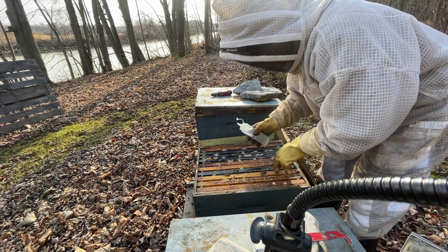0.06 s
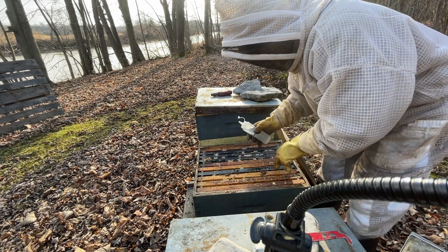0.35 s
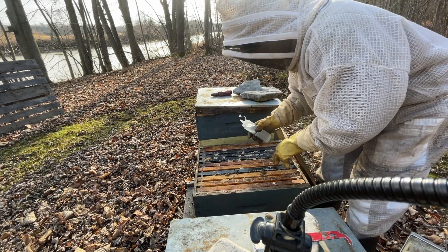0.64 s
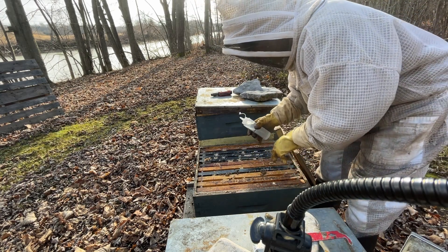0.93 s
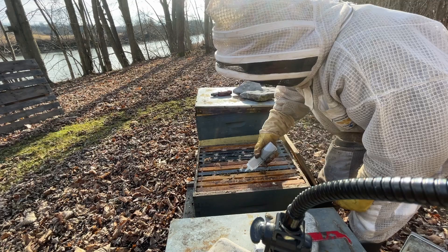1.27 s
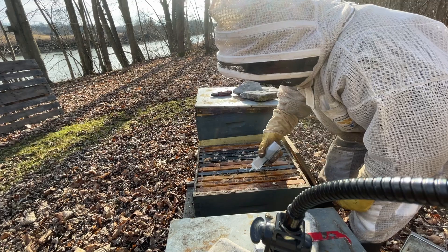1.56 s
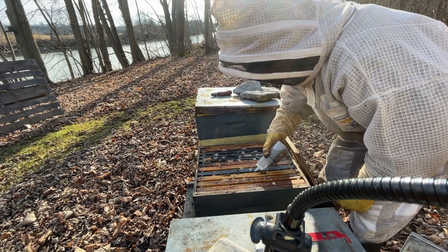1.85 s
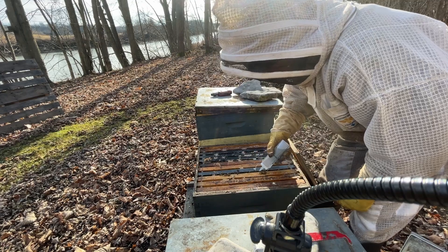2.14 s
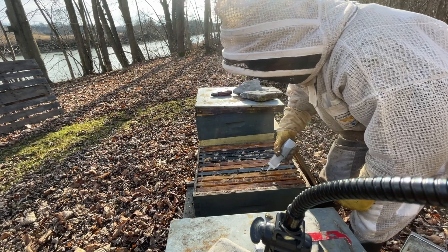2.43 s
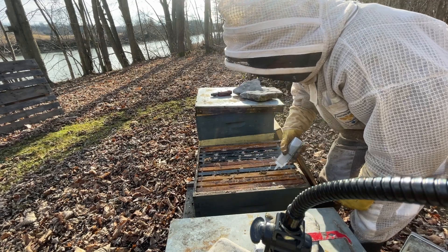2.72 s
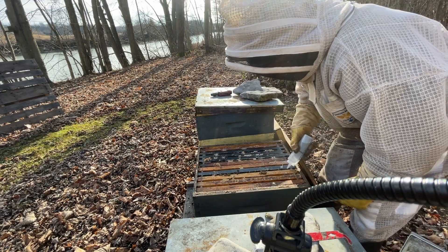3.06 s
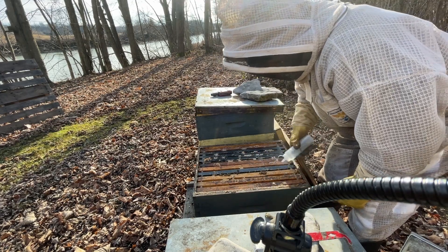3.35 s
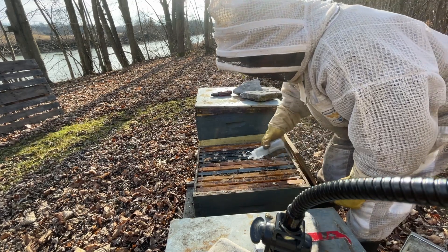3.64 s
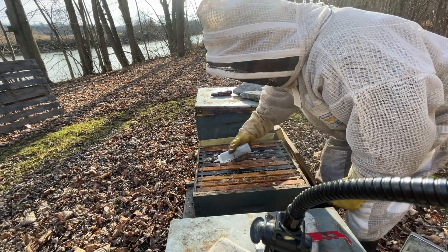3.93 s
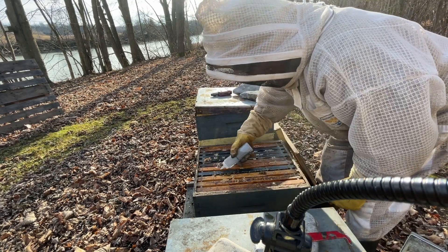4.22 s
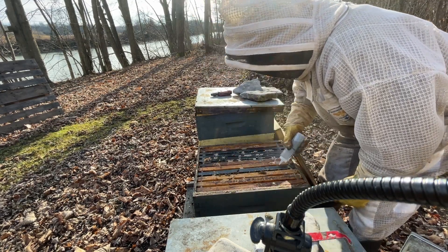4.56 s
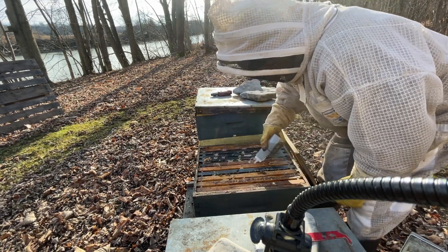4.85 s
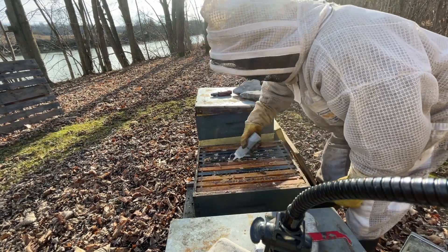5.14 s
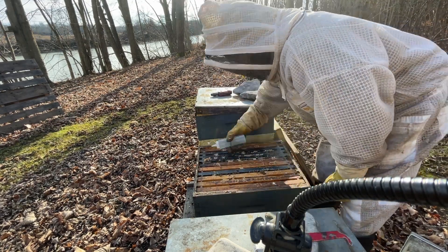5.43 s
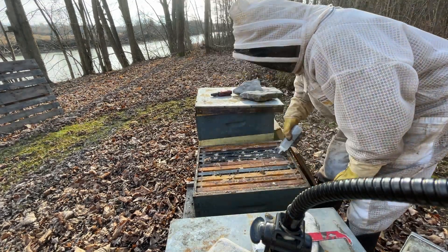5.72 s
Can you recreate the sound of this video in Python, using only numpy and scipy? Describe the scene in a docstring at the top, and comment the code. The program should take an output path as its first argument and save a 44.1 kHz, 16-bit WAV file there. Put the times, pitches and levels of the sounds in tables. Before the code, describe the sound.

An open beehive in a wood is heard in stereo from about a metre away. A low breeze, soft rustling with tiny dry leaf crackles, and faint swishes of cloth continue throughout. From the start to about 1.7 seconds, a steel tool makes roughly nine quick back-and-forth strokes, each with a metallic tick, a dry wooden knock and a short rasping hiss along wax; the last two knocks are weaker. A brief scrape comes at 2 seconds, then single ticks. Hollow box thumps cluster between 2.5 and 2.8 seconds. A tap and scrapes follow around 3.2, a sharp tick at 3.5, a hard thump with cracking resin at 3.6 and a lighter one at 3.7. A longer scrape swells around 4.1, ending in ticks. From about 4 seconds, gusts buffet the microphone, more on the left, while the edge picks faintly through wax crumbs until nearly 6 seconds.

```python
"""An open hive in a wood, the beekeeper at work about a metre from a stereo microphone.
Over a low breeze, leaves and rustling cloth come quick to-and-fro strokes: the steel tool ticks,
a frame knocks at each end of its travel, and the blade hisses along the wax. From two seconds on
there are slow scrapes and single ticks, and between them blows thump the hollow box.
From about four seconds gusts buffet the microphone while the edge picks through crumbs of wax."""
import sys
import numpy as np
from scipy import signal
from scipy.fft import rfft, irfft
from scipy.io import wavfile
from scipy.ndimage import uniform_filter1d

SR = 44100
rng = np.random.default_rng(int(sys.argv[2]) if len(sys.argv) > 2 else 0)


def persist_wave(psi):
    """Save psi, clipped to +-1, as 16-bit WAV."""
    counts = np.round(np.clip(psi, -1, 1) * 32767).astype(np.int16)
    wavfile.write(sys.argv[1], SR, np.atleast_2d(counts).T)


N = 255197
T = np.arange(N) / SR
RING_T = np.arange(int(.3 * SR)) / SR  # seconds since a contact

# The air of the wood. Each row: time in seconds, relative levels of breeze and of rustle in dB.
AIR_LEVELS = [(0.0, -44.5, -45), (0.69, -43, -48), (1.26, -43.5, -47), (1.45, -44, -45), (2.34, -45, -52),
              (2.74, -40.5, -48.5), (2.93, -44, -51.5), (3.22, -42.5, -49), (3.59, -43, -48),
              (3.85, -48.5, -53), (4.19, -45.5, -48), (5.79, -49, -55.5)]
# Spectrum of a crack. Each row: frequency in Hz, density in dB.
CRACK_COLOUR = [(600, -38), (1500, 2.5), (3000, 6.5), (5000, -7), (7500, -4.5), (10000, -14),
                (13000, -15.5), (15000, -58)]
# Modes of the hive box. Each row: frequency in Hz, level in dB, t60 in seconds.
BOX_MODES = [(75.6, -12, 0.13), (135.7, -14, .22), (156, 0, .1), (245, -1, 0.058), (365, 0, 0.064),
             (469, 0, 0.044), (529, .5, 0.038), (700, -4, 0.055), (916, -1.5, 0.048), (1061, 2.5, .035),
             (1350, 0, 0.033), (1593, -2, 0.027), (2064, -7, 0.032), (2500, -6, 0.037)]
# Pushes of the tool. Each row: knock time in seconds, strength and hardness in dB, seconds by which
# the catch of the edge leads the knock.
PUSH_STROKES = [(.232, 0, -0.5, .0215), (.6881, 0, -1, .0155), (1.121, -1, -2, .0185),
                (1.467, -10.5, -8.5, .0205)]
# Pulls back. Each row: as for a push, then catch strength in dB, lead of the bar's bump in seconds.
PULL_STROKES = [(0.0913, -1.5, -1.5, 0.057, -19, .0556), (0.4936, 0, 2.5, 0.084, -1.5, 0.05),
                (0.9804, 0, -1, .0925, -2, .057), (1.3715, 3, 1, 0.0788, -1, .0425),
                (1.694, -18, -3.5, 0.083, 0.5, .05)]


def undb(db):
    """Decibels to gain."""
    return 10 ** (np.asarray(db) / 20)


def add(out, s, sound):
    """Mix a stereo sound in at s seconds."""
    i = max(int(s * SR), 0)
    out[:, i:i + sound.shape[1]] += sound[:, :N - i]


def noise(colour, size, likeness):
    """Stereo noise of rms 1, coloured by rows of Hz and dB; likeness correlates the two sides."""
    hz, db = np.transpose(colour)
    log_hz = np.log(np.maximum(np.fft.rfftfreq(size, 1 / SR), 1))
    gain = undb(np.interp(log_hz, np.log(hz), db, left=-90, right=-90))
    mid, side = irfft(rfft(rng.standard_normal((2, size))) * gain, size)
    x = np.sqrt(1 + likeness) * mid + np.sqrt(1 - likeness) * np.array([side, -side])
    return x / x.std()


def wander(rate_hz):
    """Smooth random drift with a spread of 1."""
    step = int(SR / rate_hz)
    x = uniform_filter1d(np.repeat(rng.standard_normal(N // step + 1), step), step)[:N]
    return x / x.std()


def burst(x, db):
    """Scale a short sound so that its energy, spread over 20 ms, has this level."""
    return x * undb(db) / np.sqrt(np.sum(x ** 2) / 2 / (.02 * SR))


def blow(answer, db, hardness_db):
    """Levels of a blow's parts, low to high: strength lifts all, hardness favours the high ones."""
    return np.array(answer) + db + hardness_db * np.linspace(-.5, .5, len(answer))


def ring(modes, lo_hz, hi_hz, lag_ms, swell, scatter_db):
    """Struck modes in a band, swelling over `swell` cycles; the left port hears them lag_ms later."""
    t = np.maximum(RING_T - np.array([[lag_ms / 1000], [0]]), 0)
    out = 0
    for hz, db, t60 in modes:
        detune, size, side, turn = rng.uniform(-1.36, 1, 4)
        if lo_hz <= hz < hi_hz:
            shape = (1 - np.exp(-t * hz / swell)) ** 2 * np.exp(-np.log(1000) * t / t60)
            apart = min(hz / 1000, 1) * np.array([[1], [-1]])  # short waves differ between the ports
            pitch = hz + 14 * detune  # the grip shifts every mode a little
            wave = np.sin(2 * np.pi * pitch * t + 0.33 * turn * apart)
            out = out + undb(db + scatter_db * size + 2 * side * apart) * shape * wave
    return out


def crack(colour, rise_s, t60_s, grit_db):
    """Fibres or hard resin give way in a gritty burst."""
    size = len(RING_T)
    grit = undb(grit_db * np.repeat(rng.standard_normal(size), 16)[:size])
    shape = (1 - np.exp(-RING_T / rise_s)) ** 2 * np.exp(-np.log(1000) * RING_T / t60_s)
    return noise(colour, size, 0.29) * grit * shape


def breeze():
    """A breeze rumbles through the wood, a little louder on the left."""
    # Each row: frequency in Hz, density in dB.
    colour = [(20, -27), (35, -18), (55, -1), (75, 1.5), (100, -1.5), (150, -6.5), (220, -11.5),
              (400, -19.5), (700, -23.5)]
    s, breeze_db, _ = np.transpose(AIR_LEVELS)
    level_db = np.interp(T, s, breeze_db) + np.array([[4.5], [2.5]])
    return noise(colour, N, 0.73) * undb(level_db + 0.61 * wander(17))


def leaves():
    """A soft rustle, in which dry leaves crackle at random."""
    # The rustle. Each row: frequency in Hz, density in dB.
    colour = [(150, -42), (250, 4), (770, 0.5), (1500, -6), (1710, -8.5), (2000, -5.5), (2610, -11),
              (4500, -20.5), (5850, -43), (9900, -120)]
    s, _, rustle_db = np.transpose(AIR_LEVELS)
    level_db = np.interp(T, s, rustle_db) + .3
    out = noise(colour, N, .2) * undb(level_db + 1.4 * wander(40))
    for when, size in rng.random((40, 2)) * [T[-1], 1]:
        leaf = crack(CRACK_COLOUR, rise_s=.001, t60_s=.02, grit_db=3)
        add(out, when, burst(leaf, np.interp(when, T, level_db) - 9 + 7 * size ** 2))
    return out


def suit():
    """The keeper's suit hisses faintly and swishes as the arm moves."""
    # Each row: frequency in Hz, density in dB.
    colour = [(2500, -2.5), (4500, 2.5), (7000, -1.5), (10000, -1), (12500, -7), (13600, -9.5),
              (14500, -22.5)]
    # Each row: centre in seconds, half length in seconds, level in dB.
    swishes = [(0, .1, -53), (1.355, 0.15, -62), (1.86, 0.18, -51.5), (2.355, 0.24, -55), (3.5, 0.27, -52),
               (4.55, .3, -50.5), (5.054, 0.2, -55), (5.757, 0.14, -60)]
    resting_db = -60.5
    swish = sum(undb(db) * np.exp(-((T - s) / half_s) ** 2) for s, half_s, db in swishes)
    return noise(colour, N, 0.065) * np.hypot(swish, undb(resting_db)) * undb(0.46 * wander(60))


def buffeting():
    """Gusts flutter at each microphone port separately, more at the left one."""
    # Each row: time in seconds, relative level in dB.
    gusts = [(0, -64), (3.8, -65), (4.2, -40.5), (4.6, -45.5), (5.05, -39), (5.79, -41)]
    gust_db = np.interp(T, *np.transpose(gusts)) + 2 * wander(9.8)
    rumble = noise([(20, -22), (50, 0.5), (75, 1.5), (160, -25)], N, 0)
    return rumble * undb(gust_db + np.array([[1], [-4]]))


def echoes(x, db, t60_s):
    """Short diffuse echoes off the boxes, the keeper and the ground; long waves pass these by."""
    colour = [(60, -13), (250, -7.5), (480, -10), (800, -6), (2000, -9), (6000, -3), (15000, -10.5)]
    shape = np.clip((RING_T - .005) / 0.0032, 0, 1) * np.exp(-np.log(1000) * RING_T / t60_s)
    echo = noise(colour, len(RING_T), 0.62) * shape
    echo /= np.sqrt(np.sum(echo ** 2) / 2)
    return undb(db) * signal.fftconvolve(x, echo, axes=1)[:, :N]


def slide(rise_s, fastest_s, coast_s, rasp_db, hiss_db):
    """Gains of rasp and hiss as the blade speeds up and coasts to rest."""
    speed = np.interp(T - fastest_s, [-rise_s, 0, coast_s], [0, 1, 0])
    return speed ** np.where(T < fastest_s, 1.4, 1.6) * undb([[rasp_db], [hiss_db]])


def blade_slides():
    """The blade runs over waxy wood in strokes and slow scrapes: a grainy rasp and a smoother hiss."""
    # Each row: rise, time of top speed and coast in seconds, rasp and hiss in dB.
    scrapes = [(0.071, 2.031, 0.078, -36.5, -42.5), (0.054, 3.201, 0.14, -40.5, -40.5),
               (0.083, 3.305, 0.12, -39, -46), (.045, 3.685, 0.056, -39.5, -46),
               (0.33, 4.152, .13, -43, -38.5), (0.0092, 4.281, 0.29, -40.5, -52)]
    # The same columns, timed from a stroke's knock; the skid leads into the knock of a push.
    skid = (0.01, 0, 0.004, -30, -44)
    push_slide = (.085, .053, .086, -42.5, -40.7)
    pull_slide = (.012, .011, .08, -37.5, -39.5)
    # Each row: frequency in Hz, density in dB.
    rasp_colour = [(200, -11), (450, 2.5), (800, 1.5), (1200, 0), (2100, 0), (3200, -7), (5000, -18.5),
                   (9000, -34)]
    hiss_colour = [(2000, -13), (4000, -4), (7000, -4), (10000, -10), (12500, -10), (14500, -29)]
    follow = 0.34  # dB of slide per dB of knock
    gains = sum(slide(*scrape) for scrape in scrapes)
    moves = (PUSH_STROKES, skid), (PUSH_STROKES, push_slide), (PULL_STROKES, pull_slide)
    for knocks, (rise_s, after_s, *rest) in moves:
        for s, db, *_ in knocks:
            gains += undb(follow * db) * slide(rise_s, s + after_s, *rest)
    rasp = gains[0] * undb(2.4 * wander(300)) * noise(rasp_colour, N, 0.22)
    hiss = gains[1] * undb(0.83 * wander(370)) * noise(hiss_colour, N, 0.046)
    return rasp + hiss


def tool_tick(levels):
    """The steel edge catches: the hand-damped blade rings briefly, with the wood under it."""
    # Each row: frequency in Hz, level in dB, t60 in seconds.
    modes = [(426, -3, 0.034), (523, 0, 0.039), (812, -2.5, 0.027), (1148, 2.5, 0.028), (1450, 4.5, 0.02),
             (1704, 6, 0.014), (1898, 8.5, 0.014), (2497, -4.5, 0.018), (2875, 2, 0.038), (3670, 4.5, .03),
             (4730, -12, 0.024), (5360, -4, 0.024), (6210, -4, 0.021), (7260, -6.5, 0.015),
             (7560, -9.5, 0.02)]
    wood_db, blade_db, crack_db = levels
    wood = burst(ring(modes, 0, 1000, lag_ms=0.23, swell=0.43, scatter_db=4), wood_db)
    blade = burst(ring(modes, 1000, 2800, lag_ms=0.087, swell=1.23, scatter_db=1), blade_db)
    edge = burst(ring(modes, 2800, SR, lag_ms=.12, swell=4.4, scatter_db=4), crack_db - 3.5)
    crush = burst(crack(CRACK_COLOUR, rise_s=0.0006, t60_s=0.031, grit_db=4), crack_db - 1)
    return wood + blade + edge + crush


def frame_knock(levels):
    """Where the bar is struck decides which bending modes speak; hard knocks set the steel ringing."""
    # Modes of a frame bar and of the steel. Each row: frequency in Hz, level in dB, t60 in seconds.
    bar = [(259, 0, 0.021), (443, 4.5, .018), (540, -9, 0.017), (687, -0.5, 0.027), (880, -5.5, 0.022),
           (1134, 9, 0.013), (1298, 2.5, 0.017), (1576, -2, 0.023), (1830, -3, 0.019), (2370, -8.5, 0.015)]
    steel = [(1590, -16, .18), (2007, 1, 0.14), (2070, -3, 0.2), (3260, -9, 0.17)]
    first_db, second_db, middle_db, upper_db, crack_db = levels
    first = burst(ring(bar, 0, 330, lag_ms=0.27, swell=1.2, scatter_db=0), first_db)
    second = burst(ring(bar, 330, 600, lag_ms=0.27, swell=2.65, scatter_db=1.5), second_db)
    middle = burst(ring(bar, 600, 950, lag_ms=0.19, swell=0.4, scatter_db=4), middle_db)
    upper = burst(ring(bar, 950, SR, lag_ms=0.1, swell=1, scatter_db=4), upper_db)
    crush = burst(crack(CRACK_COLOUR, rise_s=0.00015, t60_s=0.066, grit_db=-0.5), crack_db - .5)
    ping = burst(ring(steel, 0, SR, lag_ms=0.082, swell=2.5, scatter_db=0), crack_db - 5.5)
    return first + second + middle + upper + crush + ping


def touches():
    """Single taps and ticks as the tool is set down, and faint ones where it meets crumbs of wax."""
    # Each row: start in seconds, strength and hardness in dB.
    taps = [(3.153, -19, -15), (3.1726, 0, -0.5)]
    ticks = [(2.018, -13, -14), (2.141, -20, 15), (2.355, -22, 17), (2.72, -22, 12), (2.984, -19.5, -8),
             (3.394, -10, -2.5), (3.446, -14, 1), (3.4924, 2.5, 2.5), (4.2865, 5, -8.5), (4.315, -7.5, -5),
             (4.358, -13, -3), (4.443, -19.5, -18), (4.675, -21, -12), (4.781, -22.5, -10),
             (4.902, -17.5, -5), (5.03, -5.5, -6.5), (5.039, -14, -20), (5.377, -27, 20)]
    # The span of the crumbs: start and end in seconds, least strength and hardness in dB.
    crumbs = (4.35, 5.65, -25.5, -4)
    # A tapped bar: four bands, low to high, and the crack, in dB.
    tap_levels = (-20.5, -24.5, -18.5, -26.5, -45)
    # A touch of the edge: wood, blade and crack in dB.
    tick_levels = (-32, -33.5, -36)
    out = np.zeros((2, N))
    for s, db, hardness_db in taps:
        add(out, s, frame_knock(blow(tap_levels, db, hardness_db)))
    for s, db, hardness_db in ticks:
        add(out, s, tool_tick(blow(tick_levels, db, hardness_db)))
    start, end, db, hardness_db = crumbs
    for when, size in rng.random((10, 2)):
        add(out, start + when * (end - start), tool_tick(blow(tick_levels, db + 5 * size, hardness_db)))
    return out


def box_thumps():
    """A frame prised loose or pushed home shakes the walls, the hollow under them and the stand."""
    # Each row: start in seconds, then strength, hardness, walls over hollow and tearing resin in dB.
    thumps = [(2.554, -0.5, 3, 7, -49.5), (2.565, 3.5, -14.5, 6.5, -52), (2.627, -8.5, -4, -1.5, -50.5),
              (2.65, -9.5, -15, -1.5, -61), (2.806, -10, -13, -7.5, -70), (3.568, -2, 24, 3.5, -20.5),
              (3.574, 9, 11, -6, -15.5), (3.723, -1.5, 5.5, -4, -41)]
    # The box's answer: stand, hollow, walls and upper modes in dB.
    box_levels = (-28, -18.5, -22.5, -35)
    # Resin tearing apart. Each row: frequency in Hz, density in dB.
    tear_colour = [(600, 2), (1400, 6), (2700, 7), (4000, 0), (7000, -5), (11000, -7), (13500, -10),
                   (16000, -26)]
    out = np.zeros((2, N))
    for s, db, hardness_db, favour_db, tear_db in thumps:
        stand_db, hollow_db, walls_db, upper_db = blow(box_levels, db, hardness_db)
        slow = 2 ** (-min(hardness_db, 0) / 20)  # a contact 20 dB softer swells twice as long
        stand = ring(BOX_MODES, 0, 110, lag_ms=.02, swell=1, scatter_db=0)
        hollow = ring(BOX_MODES, 110, 200, lag_ms=0.022, swell=slow, scatter_db=0)
        walls = ring(BOX_MODES, 200, 600, lag_ms=0.062, swell=0.59 * slow, scatter_db=1.5)
        upper = ring(BOX_MODES, 600, SR, lag_ms=0.16, swell=1.6, scatter_db=1.5)
        add(out, s, burst(stand, stand_db) + burst(hollow, hollow_db - favour_db / 2))
        add(out, s, burst(walls, walls_db + favour_db / 2) + burst(upper, upper_db))
        add(out, s, burst(crack(tear_colour, rise_s=0.0014, t60_s=0.025, grit_db=1.5), tear_db))
    return out


def strokes():
    """A push catches, knocks and rebounds; a pull catches, bumps the bar, knocks and jolts the box."""
    # Contacts of the bar: four bands, low to high, and the crack, in dB.
    push_knock = (-14, -6, -19, -20, -35.5)
    pull_knock = (-14, -23, -22, -20.5, -32.5)
    bump = (-29.5, -29.5, -38.5, -42, -44.5)
    # Contacts of the edge: wood, blade and crack in dB.
    push_catch = (-35.5, -29, -32.5)
    pull_catch = (-32, -28, -36)
    rebound = (-31, -47, -54)
    rebound_s, jolt_db = 0.018, -31
    out = np.zeros((2, N))
    for s, db, hardness_db, catch_s in PUSH_STROKES:
        add(out, s - catch_s, tool_tick(push_catch))
        add(out, s, frame_knock(blow(push_knock, db, hardness_db)))
        add(out, s + rebound_s, tool_tick(blow(rebound, db, hardness_db)))
    for s, db, hardness_db, catch_s, catch_db, bump_s in PULL_STROKES:
        add(out, s - catch_s, tool_tick(blow(pull_catch, catch_db, 0)))
        add(out, s - bump_s, frame_knock(bump))
        add(out, s, frame_knock(blow(pull_knock, db, hardness_db)))
        jolt = ring(BOX_MODES, 0, 200, lag_ms=.02, swell=0.8, scatter_db=4)
        add(out, s, burst(jolt, jolt_db + db))
    return out


def scene():
    """Close blows with their echoes and the sliding blade, over the wood, the suit and the wind."""
    blows = strokes() + touches() + box_thumps()
    work = blows + echoes(blows, db=-17.5, t60_s=0.13) + blade_slides()
    return work + breeze() + leaves() + suit() + buffeting()


def record(dry):
    """The right microphone port resonates at 9.5 kHz; peaks clip; the top is cut at 16 kHz."""
    left, right = dry
    port = signal.lfilter(*signal.iirpeak(9500, 7, fs=SR), right)
    clipped = np.clip([left, right + undb(2) * port], -1, 1)
    return signal.sosfilt(signal.ellip(8, .2, 70, 16000, fs=SR, output="sos"), clipped)


dry = scene()
out = record(dry)
persist_wave(out)
```